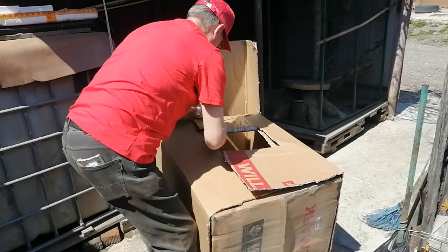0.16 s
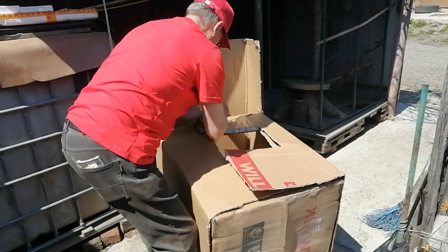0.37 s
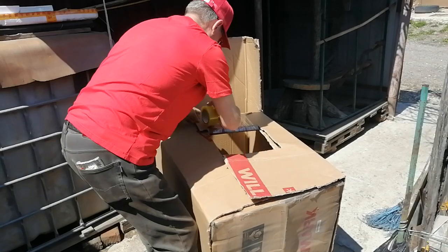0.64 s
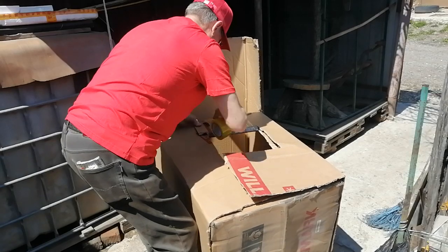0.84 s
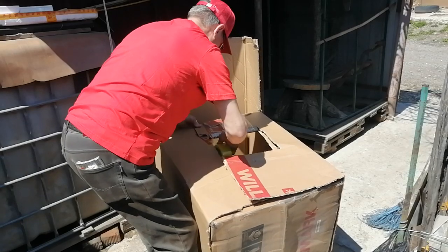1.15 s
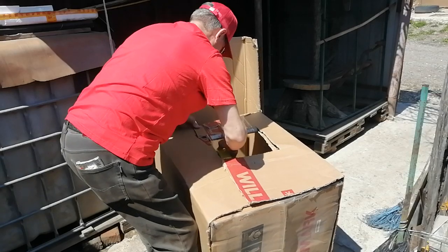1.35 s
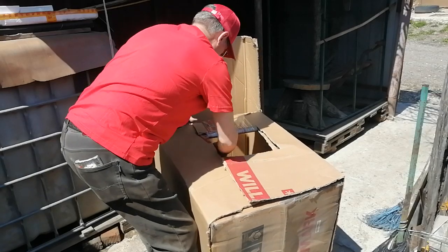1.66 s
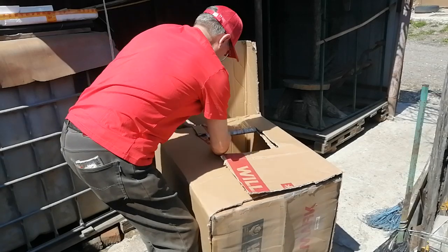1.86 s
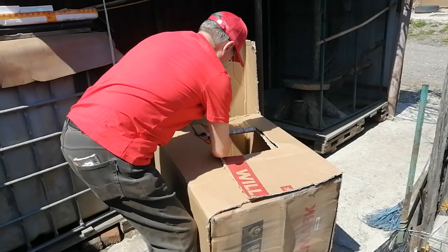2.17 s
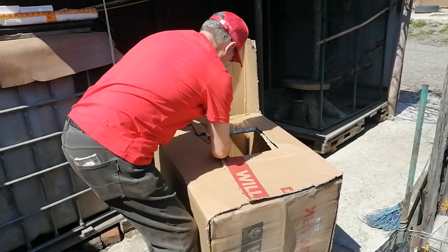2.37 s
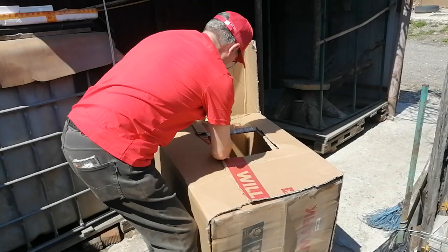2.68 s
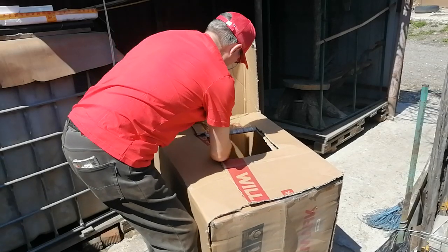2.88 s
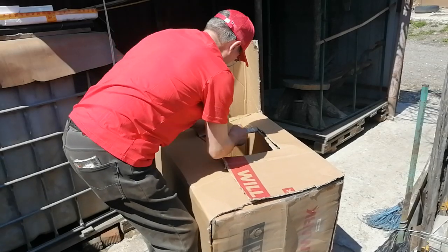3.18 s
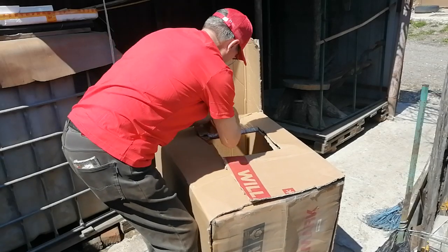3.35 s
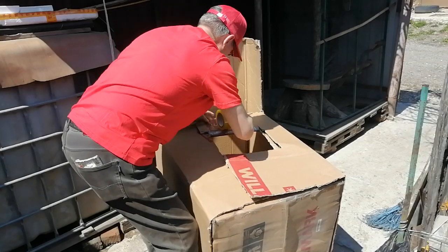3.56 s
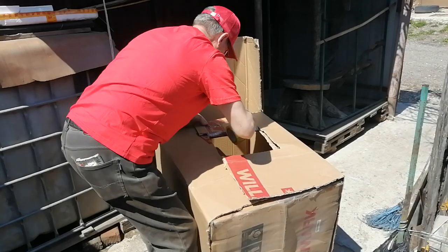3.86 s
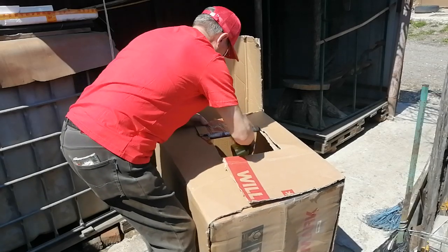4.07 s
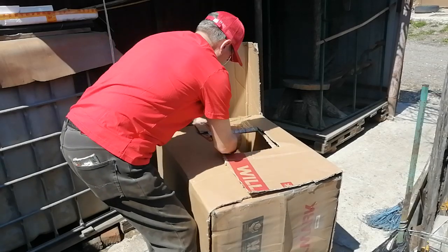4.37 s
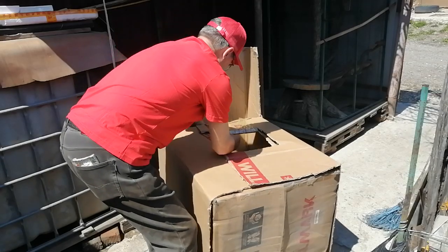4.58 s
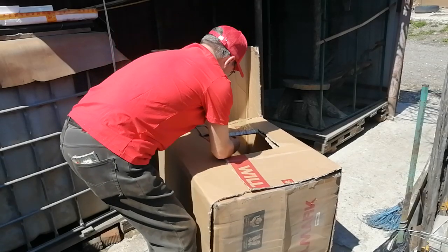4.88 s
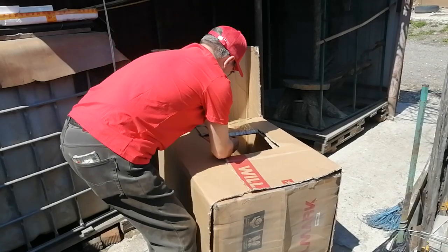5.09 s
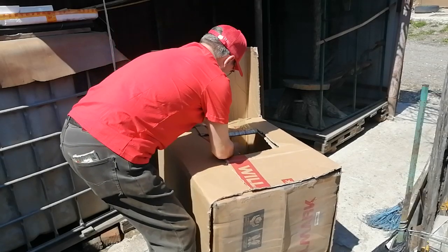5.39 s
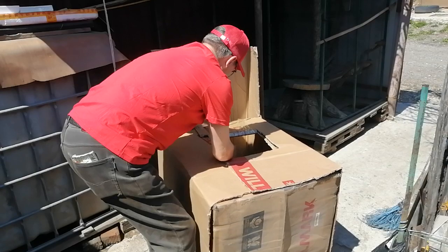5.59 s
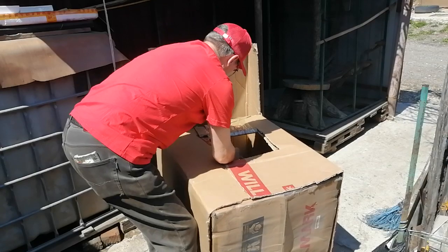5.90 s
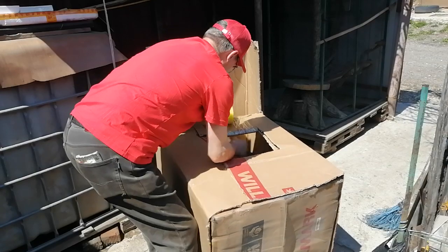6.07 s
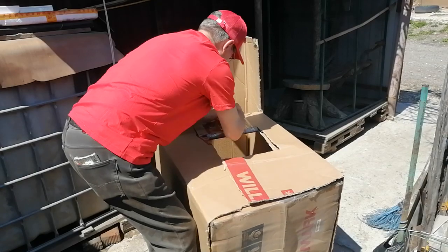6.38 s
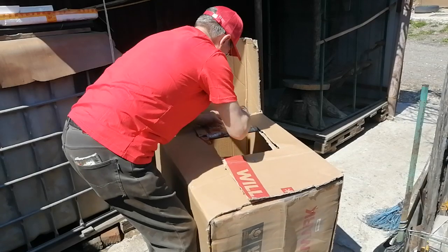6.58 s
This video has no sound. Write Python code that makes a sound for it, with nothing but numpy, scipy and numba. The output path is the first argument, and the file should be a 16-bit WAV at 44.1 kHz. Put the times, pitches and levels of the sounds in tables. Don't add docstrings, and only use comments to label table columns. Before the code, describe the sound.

Close stereo pickup at arm's length in an open shed, with short diffuse echoes, faint outdoor air, a distant low machine hum and wind rumbling on the microphone. A fading tape pull and dull bump open; crackling tugs follow at 0.35-0.5 s, then snaps and dense rasping rips from 0.65 to 1.3, some singing with a taut, buzzy tone. Hollow ticks sound at 1.45, 1.54 and 1.6, sharp snaps around 1.73, then near quiet. Softer tugs shake the box at 2.45-3.1; three quick hard raps come near 3.25. Strong rips run from 3.55 to 4.15, including a thin squeak. Scattered ticks, creases and tiny chirps fill 4.2-5.1, with wind swelling near 4.7. Loud hollow ticks at 5.2 lead into booming pulls until 5.65, with palm thumps and wind. Bright snaps near 5.95 precede short jerks from 6.1 to 6.35 and a final burst of hard ripping at 6.5-6.74.

```python
import sys
import numpy as np
from scipy import signal
from scipy.fft import rfft, irfft
from scipy.io import wavfile
from scipy.ndimage import uniform_filter1d
from numba import njit

SR = 44100
rng = np.random.default_rng(int(sys.argv[2]) if len(sys.argv) > 2 else 0)


def to_wav(sig):
    pcm = np.clip(np.atleast_2d(sig), -1, 1) * 32767
    pcm = np.round(pcm).astype(np.int16)
    wavfile.write(sys.argv[1], SR, pcm.T)


def gain_from_decibels(decibels):
    exponent = np.asarray(decibels, float) / 20
    return 10 ** exponent


N = 297234


def rms_one(x):
    return x / np.sqrt(np.mean(x ** 2) + 1e-20)


def in_time(rows):
    s, *columns = np.transpose(rows)
    return [np.interp(np.arange(N) / SR, s, c) for c in columns]


def colour(x, points, share=1):
    hz, db = np.transpose(points)
    grid = np.maximum(np.arange(2049) * SR / 4096, 1)
    outline_db = share * np.interp(np.log(grid), np.log(np.maximum(hz, 1)), db)
    cepstrum = irfft(np.log(gain_from_decibels(outline_db)))
    cepstrum[1:2048] *= 2
    cepstrum[2049:] = 0
    return signal.oaconvolve(x, irfft(np.exp(rfft(cepstrum))))[:N]


def butter(x, order, hz, kind):
    return signal.sosfilt(signal.butter(order, hz, kind, fs=SR, output="sos"), x)


def drift(rate_hz):
    r = np.exp(-2 * np.pi * rate_hz / SR)
    return rms_one(signal.lfilter([1], [1, -2 * r, r * r], rng.standard_normal(N + SR))[SR:])


@njit
def resonate(x, hz, width_hz, sr):
    out, r = np.zeros(len(x)), np.exp(-np.pi * width_hz / sr)
    for i in range(2, len(x)):
        drive = (1 - r * r) / 2 * (x[i] - x[i - 2])
        out[i] = drive + 2 * r * np.cos(2 * np.pi * hz[i] / sr) * out[i - 1] - r * r * out[i - 2]
    return out


def swells(rows, rise, fall, rest_db):
    t = np.arange(N) / SR
    humps = [db - np.maximum(rise * (s - t), fall * (t - s)) for s, db in rows]
    return np.maximum(np.max(humps, axis=0), rest_db)


def port_noise(low_hz, high_hz):
    common, own = rng.standard_normal((2, N))
    return rms_one(butter([common + 0.25 * own, common - 0.052 * own], 2, [low_hz, high_hz], "band"))


# t/s, level/dB, third harmonic re first/dB
MACHINE = [(0, -50, -10), (.4, -57.5, -2.5), (1.1, -59.5, -4), (1.4, -57, 8.5), (1.72, -55.5, 4),
           (1.8, -53, -7.5), (2.35, -50, -10.5), (2.6, -68, 1), (4.2, -58.5, -3.5), (5.1, -63.5, 0),
           (6.74, -67, 4)]
MACHINE_HZ, SECOND_DB, SWELL_DB = 87.4, -4.5, 4.5


def hum():
    level_db, strain_db = in_time(MACHINE)
    phase = 2 * np.pi * MACHINE_HZ * np.arange(N) / SR + 0.51 * drift(6.3)
    out = np.zeros(N)
    for k, db in enumerate([level_db, level_db + SECOND_DB, level_db + strain_db]):
        out += gain_from_decibels(db - 3.5 + SWELL_DB * drift(13.3)) * np.sin((k + 1) * phase)
    return out


# f/Hz, level/dB
AIR_COLOUR = [(35, -15), (60, -16), (98, -2), (217, -9), (262, -8), (621, -13.5), (2580, -30.5),
              (3850, -28), (8320, -68), (16000, -50)]


def air():
    common, own = rng.standard_normal((2, N))
    pair = np.array([colour(common + side * 0.75 * own, AIR_COLOUR) for side in (1, -1)])
    return gain_from_decibels(-63 + 4.9 * drift(2.7)) * rms_one(pair)


# t/s, peak level/dB
WIND_GUSTS = [(0.03, -40), (.3, -50), (0.701, -56), (1.22, -57), (2.17, -52.5), (2.8, -56.5), (3.4, -56),
              (3.8, -56), (4.42, -51.5), (4.7, -42.5), (5.66, -41.5), (6.45, -59)]


def wind():
    level_db = swells(WIND_GUSTS, rise=104, fall=92, rest_db=-63)
    return gain_from_decibels(level_db + 0.62 * drift(15.0)) * port_noise(36, 75)


# t/s, peak level/dB
PALM_BUMPS = [(.02, -40), (.12, -50), (.24, -51), (.45, -49), (.92, -51), (2.5, -50), (2.91, -49),
              (3.75, -53), (3.96, -52), (5.24, -54.5), (5.48, -48.5), (5.65, -41.5), (5.78, -48),
              (6.25, -44), (6.57, -44), (6.72, -44.5)]


def bumps():
    level_db = swells(PALM_BUMPS, rise=183, fall=162, rest_db=-68.5)
    return gain_from_decibels(level_db + 2.0 * drift(2.5)) * port_noise(110, 220)


# start t/s, full t/s, let go t/s, crackle level/dB, strip f/Hz
LOADED_TUGS = [
    (0, .001, 0.035, -37, 1000),
    (2.41, 2.44, 2.8, -62, 805),
    (2.473, 2.5, 2.55, -40.5, 1420),
    (2.652, 2.68, 2.727, -37, 775),
    (2.86, 2.9, 2.99, -40, 1510),
    (5.32, 5.325, 5.47, -36, 2700),
    (5.558, 5.565, 5.657, -35, 1450),
    (6.7, 6.72, 6.6, -30.5, 960),
]
# start t/s, let go t/s, crackle level/dB, strip f/Hz
CREASING = [(0.06, 0.077, -46, 970), (0.176, .32, -67, 850), (2.0, 2.11, -66.5, 900),
            (2.635, 2.65, -47, 1440), (4.508, 4.586, -66, 1000), (5.765, 5.79, -65, 1200),
            (6.016, 6.099, -71, 1180), (.637, .655, -48, 1000), (.68, .76, -47.5, 1280),
            (.81, 0.838, -43, 1400), (1.375, 1.385, -61, 900), (1.703, 1.75, -51, 2700),
            (1.895, 1.939, -59.5, 1340), (2.324, 2.352, -57, 1170), (3.33, 3.34, -65, 2700),
            (3.49, 3.54, -67, 880), (4.198, 4.225, -52, 1130), (4.249, 4.255, -53, 1500),
            (4.28, 4.29, -51, 1050), (4.355, 4.39, -60, 2800), (4.41, 4.47, -64, 2600),
            (4.66, 4.68, -70, 1500), (4.678, 4.78, -64.5, 2400), (4.805, 4.902, -57, 2900),
            (4.928, 4.95, -54, 3000), (5.045, 5.07, -54, 2200), (4.98, 5.036, -71, 1500),
            (5.1, 5.177, -71, 1500), (5.836, 5.912, -63.5, 1862), (5.918, 5.97, -53, 1893),
            (6.424, 6.425, -48, 660)]
# start t/s, full t/s, let go t/s, crackle level/dB, strip f/Hz
SINGING_TUGS = [
    (0.345, .346, .4, -36, 820),
    (0.928, 0.929, .98, -31.5, 793),
    (3.851, 3.852, 3.908, -34, 1240),
    (3.999, 4.005, 4.04, -31.5, 1280),
]
# start t/s, full t/s, let go t/s, crackle level/dB, strip f/Hz
FREE_TUGS = [(.405, .415, .47, -32.5, 1880), (.985, .99, 1.05, -36, 900), (1.19, 1.21, 1.313, -36.5, 1370),
             (2.92, 2.93, 3.0, -40, 1150), (3.038, 3.039, 3.058, -32.5, 1307),
             (3.07, 3.085, 3.1, -33.5, 1270), (3.549, 3.6, 3.61, -33.5, 1900),
             (5.184, 5.234, 5.27, -36.5, 1530), (5.28, 5.285, 5.32, -43, 2000),
             (6.25, 6.258, 6.285, -38.5, 847), (6.114, 6.115, 6.26, -45, 950)]
# start t/s, let go t/s, crackle level/dB, strip f/Hz
SHORT_JERKS = [(0.991, 1.003, -30.5, 1100), (1.014, 1.016, -32, 1480), (1.027, 1.03, -32, 1500),
               (1.037, 1.047, -34.5, 1190), (1.061, 1.062, -38.5, 1200), (1.073, 1.077, -39.5, 1200),
               (0.763, 0.771, -36, 1100), (0.793, 0.801, -33.5, 1160), (3.122, 3.153, -36.5, 1296),
               (3.675, 3.683, -35, 1400), (3.736, 3.744, -32.5, 775), (3.786, 3.84, -38, 1100),
               (3.837, 3.838, -35, 820), (6.303, 6.327, -36.5, 3280), (6.535, 6.564, -36.5, 1260)]
# start t/s, full t/s, let go t/s, crackle level/dB, strip f/Hz
PRESSED_TUGS = [(.845, .88, .9, -33, 1400), (.89, .905, .928, -31.5, 2000), (3.236, 3.237, 3.26, -44, 2500),
                (3.284, 3.285, 3.305, -46, 2810), (2.81, 2.815, 2.88, -44.5, 1890),
                (3.59, 3.61, 3.66, -33.5, 2190), (3.905, 3.92, 3.96, -33, 1300),
                (3.95, 3.96, 4.0, -32.5, 1750), (4.04, 4.041, 4.09, -32, 1000),
                (4.085, 4.09, 4.13, -33.5, 1200), (5.235, 5.24, 5.275, -36, 2870),
                (6.16, 6.185, 6.2, -30.5, 1300), (6.575, 6.598, 6.64, -28, 2250),
                (6.64, 6.641, 6.7, -33, 1300)]
# start t/s, let go t/s, crackle level/dB, strip f/Hz
FILM_FLUTTERS = [
    (1.448, 1.466, -52, 750),
    (1.532, 1.55, -57, 750),
    (1.597, 1.617, -57, 756),
    (4.29, 4.332, -50.5, 2800),
    (4.839, 4.858, -50, 2900),
    (6.0, 6.1, -67, 1180),
]
# crackle level/dB, strip re crackle/dB, box re crackle/dB, strip f/Hz
RUSTLE = (-76.5, -1, -9, 947)
LINGER_STRIP, LINGER_BOX = 0.11, 0.2


def tugs():
    def at_once(rows):
        return [(row[0], *row) for row in rows]

    kinds = [(PRESSED_TUGS, (198, 400, 1.5, -4.5, 3)),
             (LOADED_TUGS, (118, 423, 0, -2.5, 2.6)),
             (SINGING_TUGS, (185, 406, 2, -3.5, -1.1)),
             (at_once(SHORT_JERKS), (100, 539, -0.5, -4.5, -2.5)),
             (FREE_TUGS, (221, 387, -6, -11.5, 3)),
             (at_once(FILM_FLUTTERS), (100, 220, -11, -16, 0.6)),
             (at_once(CREASING), (100, 190, -2.5, -11, 0.6))]
    t = np.arange(N) / SR
    now = np.repeat(np.array(RUSTLE, float)[:, None], N, axis=1)
    for rows, (rise, fall, strip_db, box_db, sag) in kinds:
        for start, full, let_go, db, hz in rows:
            span = slice(int(max(start, 0) * SR), int((let_go + 0.4) * SR))
            early = rise * np.maximum(full - t[span], 0)
            late = fall * np.maximum(t[span] - let_go, 0)
            pitch_hz = hz * 2 ** (-sag * np.clip(t[span] - full, 0, 0.3))
            tug = [db - early - late, strip_db + LINGER_STRIP * late, box_db + LINGER_BOX * late, pitch_hz]
            now[:, span] = np.where(tug[0] > now[0, span], tug, now[:, span])
    return now


def tautness(crackle_db):
    ring = np.where(crackle_db > -43, 2.2, 0.6)
    for start, _, let_go, _, _ in SINGING_TUGS:
        ring[int(start * SR):int(let_go * SR)] = 7.0
    return uniform_filter1d(ring, size=300)


def releases(crackle_db, per_s, spread_db, clump_db):
    rate = np.clip(per_s * gain_from_decibels(0.4 * (crackle_db + 34.5)), 2000, 20000)
    sizes = gain_from_decibels(spread_db * np.minimum(rng.exponential(1, N), 5)) * rng.choice([-1, 1], N)
    clicks = sizes * (rng.random(N) < rate / SR) * gain_from_decibels(clump_db * drift(200))
    return clicks / np.sqrt(rate)


# f/Hz, width/Hz, level/dB
PANEL_TONES = [(294.3, 38, 8), (400, 490, -6), (501.6, 22, 2), (640, 15, 5), (775, 144, 7)]


def panels(x):
    out = x.copy()
    for hz, width_hz, db in PANEL_TONES:
        out += gain_from_decibels(db) * 2 * resonate(x, np.full(N, float(hz)), width_hz, SR)
    return out


# f/Hz, level/dB
GLUE_COLOUR = [(2300, -36.5), (3200, 2), (4500, 3.5), (5400, 9.5), (8000, 0.5), (12000, -7), (15000, -10),
               (16500, -19)]
# f/Hz, level/dB
STRIP_COLOUR = [(450, -23), (750, 1), (1200, -1.5), (1900, 0), (2800, 1.5), (3700, -4.5), (5000, -33.5)]
# f/Hz, level/dB
BOX_COLOUR = [(120, -10), (220, -13.5), (350, 4), (550, 5.5), (800, -5.5), (1100, -15.5), (1600, -37)]


def peeling(crackle_db, strip_db, box_db, strip_hz):
    fine = releases(crackle_db, per_s=8000, spread_db=2.8, clump_db=1.6)
    coarse = 0.6 * fine + 0.8 * releases(crackle_db, per_s=5500, spread_db=2.4, clump_db=1.8)
    ring = resonate(tautness(crackle_db) * coarse, strip_hz, 60.0, SR)
    hump = 1.4 * resonate(coarse, strip_hz, 800.0, SR)
    crackle = gain_from_decibels(crackle_db - 1.0) * rms_one(colour(fine, GLUE_COLOUR))
    strip = gain_from_decibels(crackle_db + strip_db - 3.0) * rms_one(colour(coarse + ring + hump, STRIP_COLOUR))
    box = gain_from_decibels(crackle_db + box_db - 4.0) * rms_one(colour(panels(coarse), BOX_COLOUR))
    return crackle + strip + box


# f/Hz, level/dB
THREAD_COLOUR = [(400, -23.5), (900, 0), (2500, 0), (5500, 2), (9000, -0.5), (15000, -12)]
THREADS_PER_S, THREAD_DB, THREAD_SPREAD_DB = 450, -5, 2.5


def spikes(crackle_db):
    sizes = gain_from_decibels(THREAD_SPREAD_DB * np.minimum(rng.exponential(1, N), 4)) * rng.choice([-1, 1], N)
    clicks = sizes * (rng.random(N) < THREADS_PER_S / SR)
    return gain_from_decibels(crackle_db + THREAD_DB) * rms_one(colour(clicks, THREAD_COLOUR))


# start t/s, length t/s, f/Hz, level/dB
WALL_BOOMS = [(0, .05, 780, -43), (0, .05, 380, -47), (.13, .1, 410, -60), (.2, .08, 280, -62),
              (2.42, .04, 480, -57), (2.46, .09, 410, -44.5), (2.49, .04, 830, -44),
              (2.49, .04, 210, -43.5), (2.65, .04, 420, -43), (2.675, .05, 700, -41), (2.71, .04, 450, -42),
              (2.8, .03, 430, -49), (2.85, .04, 320, -48), (2.88, .06, 460, -45.5), (2.95, .05, 420, -49),
              (5.31, .06, 295, -44), (5.37, .06, 295, -37), (5.43, .06, 295, -39.5), (5.34, .05, 530, -53),
              (5.58, .04, 480, -35), (5.61, .07, 490, -41), (3.88, .05, 760, -43), (4.64, .07, 125, -53),
              (3.039, .04, 538, -48), (3.079, .09, 560, -50), (2.95, 0.085, 1036, -53),
              (6.16, .06, 801, -43), (3.64, .05, 1100, -44), (4.002, 0.07, 616, -40),
              (2.67, 0.055, 2000, -43), (6.42, 0.036, 638, -50)]


def booms():
    out = np.zeros(N)
    for start, length, hz, db in WALL_BOOMS:
        at, size = int(start * SR), int(length * SR)
        rough = np.cumsum(rng.normal(0, 0.006, size))
        tone = np.sin(2 * np.pi * hz * np.arange(size) / SR + rough)
        out[at:at + size] += gain_from_decibels(db + 3) * np.hanning(size) * tone
    return out


# t/s, peak level/dB, strip f/Hz
BOX_KNOCKS = [(.3446, -32, 800), (.7461, -20, 950), (.765, -19.5, 1150), (.7684, -20, 1200),
              (.7984, -19, 1970), (.825, -21, 1220), (2.4377, -43, 751), (2.474, -43, 681),
              (2.6354, -33, 2100), (3.8332, -41, 855), (3.8506, -43, 1240), (5.1828, -27, 2820),
              (5.5563, -28, 1600), (6.3026, -28, 3200), (6.539, -15, 1340)]
# t/s, peak level/dB
GLUE_TICKS = [(0.4928, -26), (0.6382, -28), (0.651, -22), (1.0888, -18), (1.1904, -17.5), (1.703, -27),
              (1.728, -15), (1.7431, -12.5), (1.613, -41), (1.624, -40), (1.636, -44), (1.669, -56),
              (0.472, -32), (0.7359, -18), (4.198, -33), (4.266, -33), (4.286, -22), (4.455, -34),
              (4.981, -46), (5.064, -33), (5.199, -26), (5.2176, -17), (5.242, -19), (5.253, -31),
              (5.5637, -28), (5.8807, -45), (6.1442, -18.5), (6.167, -29), (6.498, -33), (5.126, -60),
              (5.164, -57), (4.854, -29), (6.543, -19.5), (2.4906, -21.5), (1.1758, -33), (4.2189, -19.5),
              (4.2492, -21.5), (4.36, -27), (4.51, -37), (4.7517, -36.5), (4.8045, -33.5), (4.8366, -23.5),
              (4.9023, -30), (4.9268, -17), (5.2135, -18), (2.194, -46.5), (5.9297, -25), (1.301, -24),
              (1.33, -32), (3.042, -29), (3.052, -23), (3.065, -30), (5.9197, -45), (6.1137, -33),
              (6.126, -32), (6.567, -20)]
# t/s, peak level/dB, strip f/Hz
STRIP_PLUCKS = [(.6818, -25.5, 3000), (.6993, -26, 1240), (.7173, -23.5, 1110), (.7294, -22, 1190),
                (.795, -19, 1060), (1.7427, -25, 2300), (.9725, -22, 1020), (2.8166, -43, 2100),
                (2.651, -34, 1230), (2.341, -43.5, 3000), (3.0365, -18.5, 3300), (3.0594, -22, 3140),
                (3.5487, -25, 1970), (3.5657, -22.5, 1160), (3.787, -29, 1020), (4.2078, -22, 3320),
                (4.2817, -27, 990), (4.6782, -36, 3030), (5.2304, -20, 3460), (5.3193, -25, 2260),
                (5.7665, -36, 2930), (5.9384, -24, 1980), (5.9655, -26, 1980), (6.5261, -22.5, 2350)]
# t/s, peak level/dB, f/Hz
HOLLOW_TICKS = [
    (1.4506, -18, 736),
    (1.5356, -16, 740),
    (1.6004, -26, 706),
    (3.7364, -38, 623),
    (5.1945, -13, 694),
    (5.2254, -13, 650),
    (6.141, -19.5, 660),
    (6.4255, -17.5, 620),
]
# t/s, peak level/dB, f/Hz
CORE_RAPS = [
    (3.236, -24.5, 2200),
    (3.2521, -26, 2340),
    (3.2834, -25, 2230),
    (5.0442, -40.5, 2240),
]


def all_snaps():
    kinds = [([(*row, 2710) for row in GLUE_TICKS], (-20, -25)),
             (STRIP_PLUCKS, (-6, -12.5)),
             (BOX_KNOCKS, (-8, -9.5)),
             (HOLLOW_TICKS, (-25.5, -19.5)),
             (CORE_RAPS, (0.78, -12))]
    return [(s, db, *parts_db, hz) for rows, parts_db in kinds for s, db, hz in rows]


def snaps():
    s, peak_db, strip_db, box_db, strip_hz = np.transpose(all_snaps())
    after = np.arange(900) / SR
    parts = np.zeros((3, N + len(after)))
    for k, grain in enumerate(rng.standard_normal((len(s), len(after)))):
        burst = np.clip(grain, -2.5, 2.5) ** 3 * 0.011 * np.exp(-after / 0.003)
        burst[30] = 1
        at = int(s[k] * SR)
        parts_db = np.array([[0], [strip_db[k]], [box_db[k]]])
        parts[:, at:at + len(after)] += gain_from_decibels(peak_db[k] + parts_db) * burst
    bright, middle, low = parts[:, :N]
    order = np.argsort(s)
    latest = np.searchsorted(s[order], np.arange(N) / SR + 0.001) - 1
    pitch_hz = strip_hz[order][np.maximum(latest, 0)]
    bright = bright + 0.45 * resonate(bright, np.full(N, 6050.0), 1600.0, SR)
    middle = middle + 4.47 * resonate(middle, pitch_hz, 217.0, SR)
    low = panels(low) + 20.0 * resonate(low, pitch_hz, 48.0, SR)
    tick = gain_from_decibels(5.0) * colour(bright, GLUE_COLOUR)
    return tick + gain_from_decibels(17.5) * colour(middle, STRIP_COLOUR) + gain_from_decibels(11.0) * colour(low, BOX_COLOUR)


# t/s, peak level/dB
THREAD_CRACKS = [(0.389, -20.8), (0.416, -22.0), (0.4559, -21.3), (0.4617, -26), (0.4719, -25),
                 (0.9727, -13), (0.9926, -17.3), (1.0172, -18.9), (1.0322, -19.3), (1.0431, -21.5),
                 (1.1901, -17), (1.2058, -20), (1.2233, -23.8), (1.2453, -24.4), (1.2592, -20),
                 (1.268, -19), (1.2776, -23), (1.2959, -23.2), (1.3045, -28), (1.3123, -23.9),
                 (1.3261, -25.9), (2.4751, -31.0), (2.4917, -25.1), (2.5388, -26.5), (2.6845, -24),
                 (2.7379, -29), (2.9783, -25.2), (2.9935, -27), (3.0523, -15), (3.0595, -13),
                 (3.0637, -18.2), (3.0718, -22.6), (3.5814, -25.3), (3.5999, -19.4), (3.607, -18.2),
                 (3.6172, -14), (3.6212, -18.9), (3.6811, -21.7), (3.8509, -19.6), (3.9404, -16.9),
                 (4.0076, -14.6), (4.0474, -13), (4.0662, -16.2), (4.0883, -21), (4.1248, -18.7),
                 (4.1385, -20.8), (5.3095, -29.1), (5.3968, -21.6), (5.4267, -16), (5.6201, -16),
                 (6.1716, -19.7), (6.2603, -21), (6.3079, -24), (6.3243, -22.2), (6.3297, -25),
                 (6.5664, -20.6), (6.5796, -16), (6.7139, -11), (6.7182, -14.8), (6.7369, -20)]


def cracks():
    s, db = np.transpose(THREAD_CRACKS)
    clicks = np.zeros(N)
    clicks[(s * SR).astype(int)] = gain_from_decibels(db + 2.5) * rng.choice([-1, 1], len(s))
    return colour(clicks, THREAD_COLOUR)


# t/s, peak level/dB, centre f/Hz
SPLINTERS = [(.638, -24, 12000), (1.19, -29, 12000), (1.4503, -32, 12500), (1.5353, -32, 12000),
             (1.6, -22.5, 12500), (1.612, -32, 12000), (1.624, -33, 12000), (1.669, -46, 11000),
             (1.7018, -26, 11000), (1.7276, -28, 12500), (3.549, -30, 12000), (4.1977, -36, 13000),
             (4.219, -35, 12500), (4.2492, -31, 12500), (4.281, -28, 13000), (4.36, -37, 13000),
             (4.8365, -25, 8500), (5.044, -35, 13000), (5.0442, -33, 8500), (5.063, -39, 12000),
             (5.5563, -33, 12000), (6.142, -39, 12000), (6.4252, -39, 11000), (1.015, -30, 12000),
             (1.03, -30, 12500), (1.0891, -26, 12500), (5.0442, -33, 6500), (5.919, -24, 5400),
             (5.9384, -23, 5400), (5.9655, -19.5, 5400), (6.132, -22, 5300), (6.1415, -25, 5500),
             (3.549, -23, 5500), (4.9023, -37, 5800), (5.5563, -22, 5500), (6.145, -32, 5300)]


def glints():
    after, out = np.arange(400) / SR, np.zeros((2, N + 400))
    for s, db, hz in SPLINTERS:
        bursts = rng.standard_normal((3, 400)) * np.exp(-after / 0.001)
        common, left, right = (resonate(b, np.full(400, float(hz)), 0.3 * hz, SR) for b in bursts)
        pair = 0.6 * common + np.array([left, right])
        at = int(s * SR) + 25
        out[:, at:at + 400] += gain_from_decibels(db) * pair / np.abs(pair).max()
    return out[:, :N]


# t/s, f/Hz, level/dB
HOLLOW_RINGS = [
    (1.451, 730, -44),
    (1.536, 735, -40.5),
    (1.601, 710, -56.5),
    (1.536, 1930, -48),
    (1.537, 1780, -55),
    (1.601, 1900, -53),
    (1.602, 1700, -56),
    (1.7434, 760, -40.5),
]


def hollow():
    out, after = np.zeros(N), np.arange(SR // 5) / SR
    for s, hz, db in HOLLOW_RINGS:
        decay = gain_from_decibels(db - 60 * after / 0.055)
        out[int(s * SR):int(s * SR) + len(after)] += decay * np.sin(2 * np.pi * hz * after)
    return out


# start t/s, length t/s, from f/Hz, to f/Hz, level/dB
TAPE_SQUEAKS = [
    (4.3, .018, 4900, 4600, -47),
    (4.328, .014, 4900, 6600, -47),
    (5.535, .01, 4500, 7200, -41),
    (3.905, .04, 6700, 7000, -43),
]


def squeaks():
    out = np.zeros(N)
    for start, length, from_hz, to_hz, db in TAPE_SQUEAKS:
        at, size = int(start * SR), int(length * SR)
        glide = 2 * np.pi * np.cumsum(np.linspace(from_hz, to_hz, size)) / SR
        phase = glide + np.cumsum(rng.normal(0, 0.057, size))
        tone = sum(gain_from_decibels(part_db) * np.sin((k + 1) * phase) for k, part_db in enumerate((0, -6, -11)))
        out[at:at + size] += gain_from_decibels(db) * np.hanning(size) * tone
    return out


def echo_decay(after, level_db, t60_s):
    return gain_from_decibels(level_db - 60 * after / t60_s) / np.sqrt(t60_s * SR / np.log(1e6))


def shed(x, count=4):
    after = np.arange(int(0.25 * SR)) / SR
    place = np.repeat(rng.integers(0, count, N // 400 + 1), 400)[:N]
    near = echo_decay(after, level_db=-1, t60_s=0.004)
    far = echo_decay(after, level_db=-2.5, t60_s=0.17) * (after > 0.003)
    out = np.zeros((2, N))
    for k in range(count):
        echoes = rng.standard_normal((2, len(after))) * np.hypot(near, far)
        here = x * uniform_filter1d(1.0 * (place == k), size=60)
        out += signal.fftconvolve([here], echoes, axes=1)[:, :N]
    return butter(out, 1, 1300, "high")


# t/s, left minus right level/dB
HANDS_LEAN = [
    (1.2, 1),
    (2.0, -1),
    (3.2, -1.5),
    (3.9, -0.5),
]
ECHO_SHEEN, PORT_LAG = 0.5, 1.3


def scene():
    around = hum() + air() + wind() + bumps()
    pull = tugs()
    tape = peeling(*pull) + snaps()
    room = shed(tape)
    room = room + ECHO_SHEEN * butter(room, 2, 9000, "high")
    tape = tape + spikes(pull[0]) + booms() + cracks() + hollow() + squeaks()
    late = np.interp(np.arange(N) - PORT_LAG, np.arange(N), tape)
    lean = gain_from_decibels(in_time(HANDS_LEAN)[0] * [[0.5], [-0.5]])
    return lean * (np.array([tape, late]) + room + glints()) + around


def low_pass(x):
    return signal.sosfilt(signal.butter(12, 16520, fs=SR, output="sos"), x)


# f/Hz, left minus right level/dB
PORT_DIFFERENCE = [(60, -3), (250, -1), (600, 3), (2400, -1.5), (5000, -0.5), (6500, -4), (8500, 6),
                   (11000, 0.5), (14000, -1.5)]
# f/Hz, level/dB
SHARED_DIP = [(3100, 0), (3550, -3), (3850, -7.5), (4500, -2), (5200, 0), (15300, 1), (15600, -2),
              (15900, -20), (16500, -22)]


def record(dry):
    left = colour(colour(dry[0], PORT_DIFFERENCE, 0.5), SHARED_DIP)
    right = colour(colour(dry[1], PORT_DIFFERENCE, -0.5), SHARED_DIP)
    return low_pass(np.array([left, right]))


dry = scene()
out = record(dry)
to_wav(out)
```